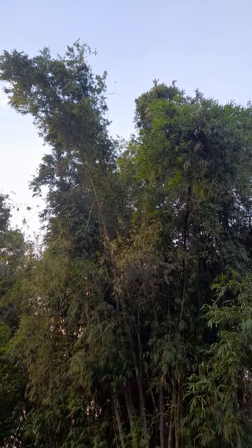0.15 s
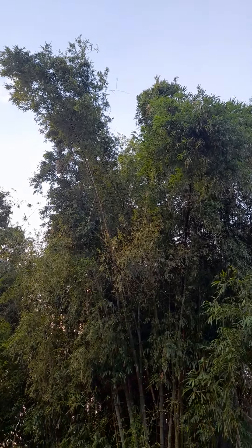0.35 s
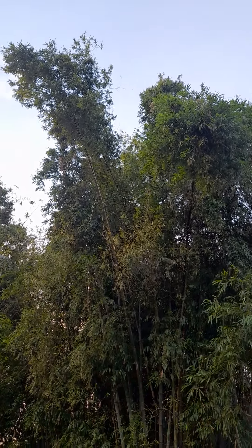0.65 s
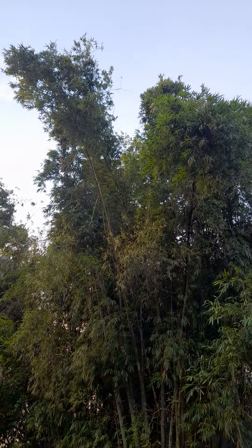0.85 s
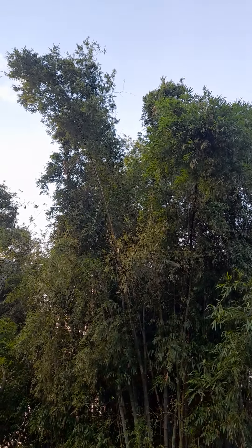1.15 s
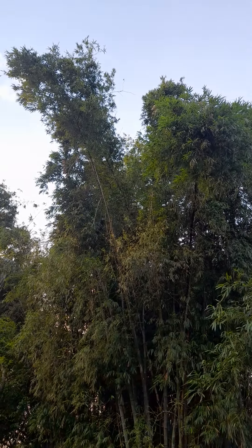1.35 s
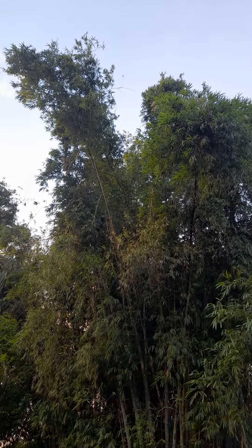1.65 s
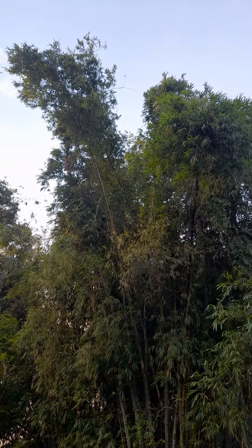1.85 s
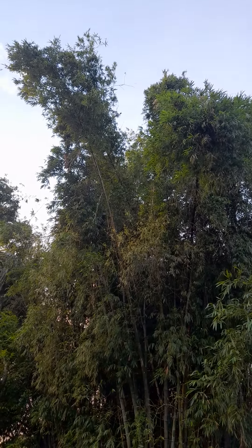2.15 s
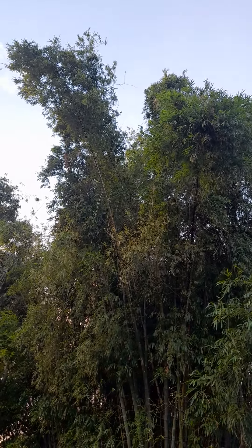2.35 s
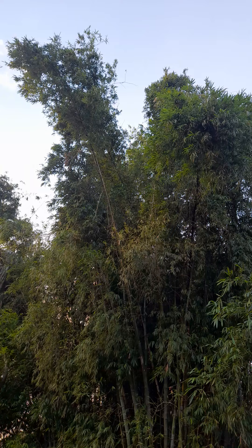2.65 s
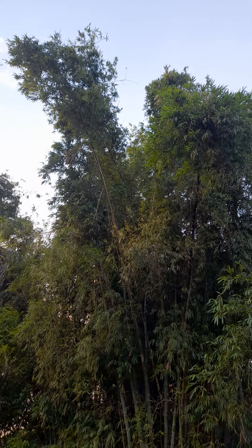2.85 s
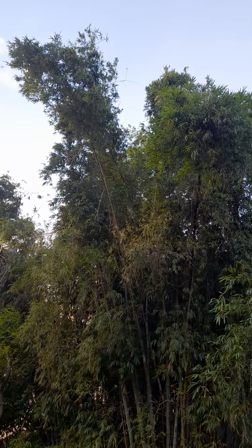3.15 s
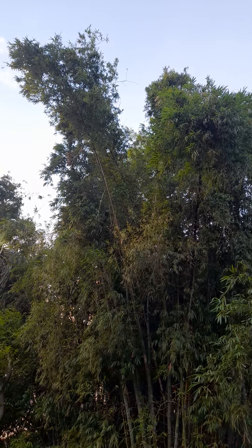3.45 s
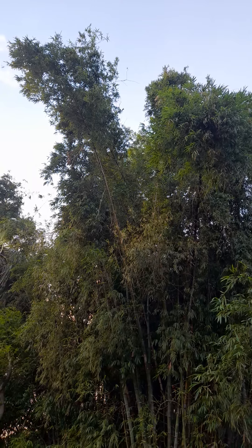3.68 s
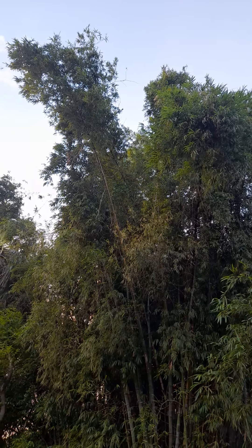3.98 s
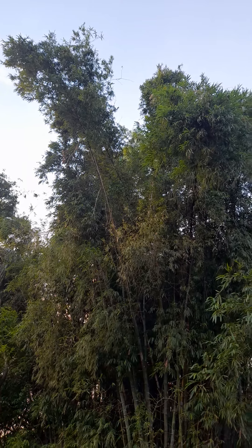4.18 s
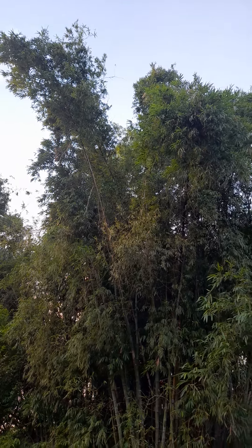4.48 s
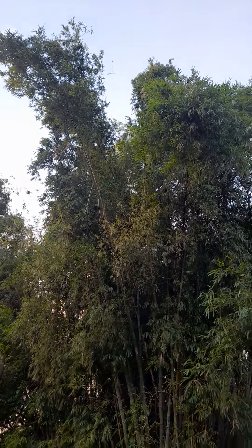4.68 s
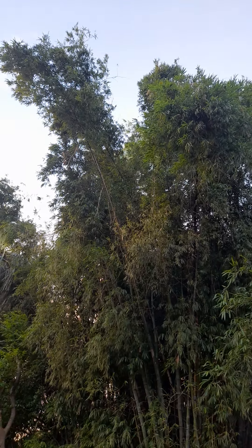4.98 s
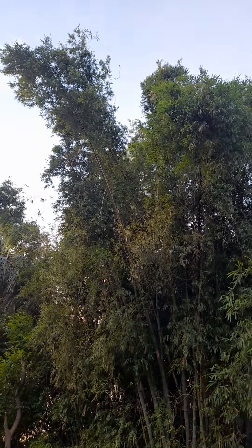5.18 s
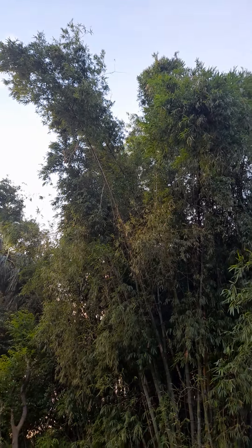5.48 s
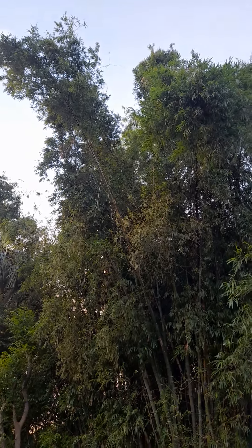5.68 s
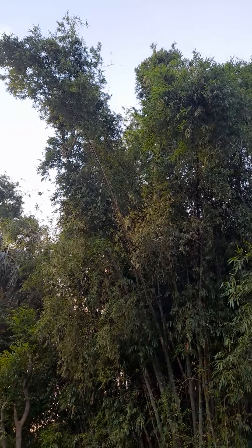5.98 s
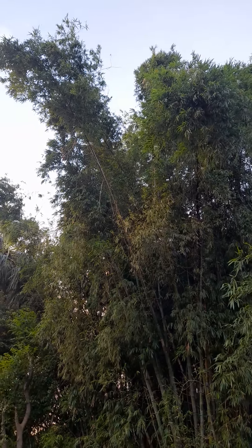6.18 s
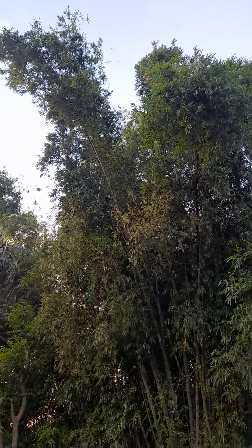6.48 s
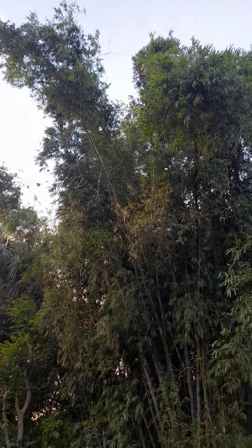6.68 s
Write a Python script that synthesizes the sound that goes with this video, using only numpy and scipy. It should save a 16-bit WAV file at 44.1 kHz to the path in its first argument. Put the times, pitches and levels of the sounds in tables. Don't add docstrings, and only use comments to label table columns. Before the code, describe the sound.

In a bamboo grove, a handheld phone hears a shrike's repeated dry, grating calls, swelling then stopping abruptly, with short leafy echoes. Early far knocks on wood, constant airy leaf noise, thin high cicada buzz and uneven deep handling-like rumble lie beneath. Near the end a duller distant bird answers, with a quiet dove-like hoot, a low coo and small chirps, before one last loud rasp is cut off.

```python
import sys
import numpy as np
from scipy import signal
from scipy.fft import rfft, irfft, next_fast_len
from scipy.io import wavfile
from scipy.ndimage import uniform_filter1d

SR = 44100
rng = np.random.default_rng(int(sys.argv[2]) if len(sys.argv) > 2 else 0)


def persist_wave(psi):
    counts = np.round(np.clip(psi, -1, 1) * 32767).astype(np.int16)
    wavfile.write(sys.argv[1], SR, np.atleast_2d(counts).T)


def invert_db(level):
    return 10 ** (np.asarray(level, dtype=float) / 20)


N = 301203


def evened(x):
    return x / np.sqrt(np.mean(x ** 2, -1, keepdims=True) + 1e-20)


def read(points, hz):
    f, value = np.transpose(points)
    return np.interp(np.log(hz + 1), np.log(f + 1), value)


def coloured(x, points, lag_samples=0.):
    size = next_fast_len(x.shape[-1] + 512)
    hz = np.fft.rfftfreq(size, 1 / SR)
    response = invert_db(read(points, hz)) * np.exp(-2j * np.pi * hz * lag_samples / SR)
    return irfft(rfft(x, size) * response, size)[..., :x.shape[-1]]


def resonate(x, hz, width_hz):
    turn = np.exp(2j * np.pi * np.cumsum(hz * np.ones(x.shape[-1])) / SR)
    r = np.exp(-np.pi * width_hz / SR)
    return 2 * (turn * signal.lfilter([1 - r], [1, -r], x / turn)).real


def drift(shape, size):
    return evened(uniform_filter1d(uniform_filter1d(rng.standard_normal(shape), size), size))


def add_at(out, start_s, sound):
    part = out[..., round(start_s * SR):][..., :sound.shape[-1]]
    part += sound[..., :part.shape[-1]]


def loudness(bird):
    threshold_db, smoothing_s = -49.5, 0.089
    power = abs(uniform_filter1d((bird ** 2).mean(0), round(smoothing_s * SR)))
    return 10 * np.log10(1 + power / invert_db(2 * threshold_db))


# frequency in Hz, level in dB per Hz.
HUM_COLOUR = [(120, -105.5), (200, -97.5), (320, -91.5), (780, -94.5), (1200, -97), (2000, -94),
              (3500, -94), (5500, -95), (7400, -96.5), (8300, -106), (9500, -101), (12000, -101),
              (14000, -105), (15500, -104)]
# frequency in Hz, left-right likeness.
HUM_SAME = [(60, 0.46), (180, 0.3), (550, 0.53), (1650, 0.088), (4970, 0), (15000, 0.081)]
# frequency in Hz, left minus right in dB.
HUM_SIDE = [(100, 0), (380, -3.5), (900, -2), (2300, -7), (3300, -3), (5000, -4), (7300, -3.5), (8200, 0),
            (12500, 3), (15500, 2)]
# time in seconds, level in dB.
HUM_COURSE = [(0, -1.5), (.8, -0.5), (1.6, -1), (2.2, -0.5), (3.5, 0.5), (4.5, 0), (5.2, .5), (5.55, 1.5),
              (6.1, 2), (6.83, -0.5)]


def hum(over_db):
    lift_per_db, swell_rms_db, patch_rms_db = 0.25, 0.74, 1.87
    frames, hz = N // 256 + 5, np.fft.rfftfreq(1024, 1 / SR)
    at = np.arange(frames) * 256
    a, b, c, d, patches = rng.standard_normal((frames, 513, 5)).T
    patches = uniform_filter1d(uniform_filter1d(patches, size=10, axis=0), size=12, axis=1)
    lift_db = lift_per_db * np.interp(at, np.arange(N), over_db - over_db.mean())
    swell_db = lift_db + swell_rms_db * drift(frames, size=30)
    far_db = np.interp(at / SR, *np.transpose(HUM_COURSE))
    reach = np.interp(hz, [1000, 3000], [1, .35])[:, None]
    same = np.clip(read(HUM_SAME, hz), -1, 1)[:, None]
    left = a + 1j * b
    z = np.array([left, same * left + np.sqrt(1 - same ** 2) * (c + 1j * d)])
    level_db = read(HUM_COLOUR, hz)[:, None] + patch_rms_db * patches / patches.std()
    level_db = level_db + reach * swell_db + (hz < 8000)[:, None] * far_db
    side_db = np.array([.5, -.5])[:, None, None] * read(HUM_SIDE, hz)[:, None]
    z *= invert_db(level_db + side_db)
    z[:, hz < 90] = 0
    return invert_db(20.5) * signal.istft(z, nperseg=1024, noverlap=768)[1][:, :N]


# peak in seconds, spread in seconds, level in dB, centre in Hz,
# upper skirt in dB relative to the level.
LUMPS = [(0.0, 0.24, -55.5, 57, 2), (.38, 0.047, -50, 72.4, -33), (.55, 0.053, -43, 81, -23),
         (.76, 0.17, -56, 75, -20), (1.0, 0.14, -50, 76, -21), (1.28, .13, -51, 78, -13),
         (1.72, 0.11, -47.5, 81.4, -21), (1.92, 0.12, -53.5, 96.5, -14), (2.36, 0.19, -49, 83.2, -8),
         (2.81, 0.029, -51.5, 68.5, -42), (3.06, 0.051, -47, 78, -64), (3.5, 0.02, -47.5, 63.6, -2),
         (3.74, 0.18, -52.5, 55, -17), (4.05, 0.16, -49.5, 68, -9), (4.28, 0.18, -52.5, 83, -10),
         (4.729, 0.078, -49, 74, -18), (4.95, 0.038, -48, 82.5, -22), (5.408, 0.031, -48.5, 73.4, -21),
         (5.6, 0.18, -49.5, 71, 3.5), (5.75, 0.025, -46.5, 73, -11), (5.948, 0.063, -46.5, 75, -5),
         (6.199, 0.048, -44, 71, -5), (6.44, 0.05, -45, 69.6, 0.5), (6.62, 0.2, -52, 73.6, -4)]


def rumble():
    rise_db, fall_db, calm_db = 10, 5., -62.5
    t = np.arange(0, N + 64, 64) / SR
    s, spread_s, peak_db, centre_hz, skirt_db = np.transpose(LUMPS)[..., None]
    u = (t - s) / spread_s
    loss_db = np.where(u < 0, rise_db * u ** 2, fall_db * u)
    power = invert_db(2 * (peak_db - loss_db)) + invert_db(2 * calm_db) / len(s)
    total = power.sum(0)
    slow = 10 * np.log10(total), (power * centre_hz).sum(0) / total, (power * skirt_db).sum(0) / total
    level_db, hz, skirt_db = (np.interp(np.arange(N) / SR, t, c) for c in slow)
    shared, left, right = rng.standard_normal((3, N))
    noise = np.array([shared + 0.73 * left, shared + 0.78 * right])
    core = evened(resonate(resonate(noise, hz, 19.2), hz, 46.5))
    core += 0.33 * evened(resonate(resonate(noise, 53.6, 21), 71, 27))
    steady = core / np.sqrt(uniform_filter1d((core ** 2).mean(0), size=5000) + 0.13)
    skirt = evened(resonate(resonate(noise, 82, 24), 127, 24))
    low = invert_db(level_db + 1.5) * (steady + invert_db(skirt_db - 12.0) * skirt) * invert_db([[-.8], [.8]])
    return signal.sosfilt(signal.butter(2, 35, "high", fs=SR, output="sos"), low)


# body resonance in Hz, width in Hz, left level in dB, right level in dB.
CICADAS = [
    (10870, 750, -85, -54.5),
    (10710, 990, -57, -53.5),
    (7440, 260, -80, -67.5),
]
CICADA_PULSE = [(131.6, .9), (137.5, .55), (43, .3)]


def cicadas(over_db):
    lift_per_db, fade_db = 0.089, -1.5
    swell_db = lift_per_db * over_db + fade_db * (np.arange(N) / N) ** 3
    out = np.zeros((2, N))
    for (hz, width_hz, left_db, right_db), (rate_hz, depth) in zip(CICADAS, CICADA_PULSE):
        turns = np.cumsum(rate_hz * (1 + .006 * drift(N, size=4000))) / SR
        bursts = 1 - depth + depth * 2 * np.exp(-(turns % 1) / .4)
        clicks = bursts * rng.standard_normal((2, N))
        buzz = resonate(resonate(clicks, hz, width_hz), hz, 1.15 * width_hz)
        out += evened(buzz) * invert_db(np.array([[left_db], [right_db]]) + 0.61 * drift(N, size=1500))
    return out * invert_db(swell_db - swell_db.mean())


# start in seconds, peak in dB, t60 in seconds.
KNOCKS = [
    (0.002, -48, 0.16),
    (0.553, -47.5, 0.34),
    (0.832, -47.5, 0.15),
    (1.049, -46.5, 0.15),
]
# frequency in Hz, level in dB.
KNOCK_COLOUR = [(250, -6), (700, 8.5), (1100, 2.5), (1400, 6), (2300, 4), (3200, -2), (5000, -28)]


def knocks():
    out, t = np.zeros((2, N)), np.arange(9000) / SR
    for start_s, peak_db, t60_s in KNOCKS:
        shared, left, right = rng.standard_normal((3, len(t)))
        burst = np.array([shared + 0.93 * left, shared + 0.88 * right]) * invert_db(-60 * t / t60_s)
        burst[:, 0] += 14.
        add_at(out, start_s, invert_db(peak_db) * coloured(burst, KNOCK_COLOUR) * invert_db([[-2.], [2.]]))
    return out


# start in seconds, length in seconds, level in dB, pitch in Hz.
COO = (5.5, .11, -59.5, 141)
# multiple of the pitch, level in dB.
COO_TONES = [(1, 5), (2, -2), (3, -5), (4, -1), (5, -7)]


def coo():
    start_s, length_s, level_db, hz = COO
    t, out = np.arange(0, length_s, 1 / SR), np.zeros(N)
    turns = 2 * np.pi * np.cumsum(hz * (1.03 - .06 * t / length_s)) / SR
    tones = sum(invert_db(db) * np.sin(k * turns) for k, db in COO_TONES)
    add_at(out, start_s, invert_db(level_db) * np.sin(np.pi * t / length_s) * tones)
    return out


# start in seconds, length in seconds, level in dB, pitch in Hz.
HOOT = [
    (5.54, 0.081, -61, 735),
    (5.693, 0.13, -60, 796),
    (5.92, 0.16, -64.5, 788),
    (6.01, 0.24, -64, 775),
]


def hoot():
    out = np.zeros((2, N))
    for start_s, length_s, level_db, hz in HOOT:
        t = np.arange(0, length_s, 1 / SR)
        turns = 2 * np.pi * np.cumsum(hz * (1 + 0.02 * drift(len(t), size=800))) / SR
        swell = np.sin(np.pi * (t / length_s) ** 0.57) ** 2
        note = invert_db(level_db + 2.5) * swell * (np.sin(turns) + 0.5 * np.sin(2 * turns))
        add_at(out, start_s, note * invert_db([[-1.5], [1.5]]))
    return out


# start in seconds, level in dB, start pitch in Hz, end pitch in Hz,
# length in seconds.
CHIRPS = [(1.396, -63.5, 6200, 5950, 0.046), (2.334, -67, 5600, 4352, 0.012),
          (2.37, -76, 5300, 4700, 0.0082), (4.795, -68, 2310, 2230, 0.049), (5.164, -66, 3040, 2880, .03),
          (5.503, -63, 1120, 1260, 0.015), (6.29, -62, 5900, 6100, 0.03), (6.438, -89, 5430, 4968, 0.011),
          (6.482, -66, 5160, 4352, 0.0133), (6.535, -67, 5500, 4940, .012), (6.577, -77, 6400, 3470, .012),
          (6.52, -68, 1850, 1870, 0.06)]


def chirps():
    side_db = -9
    out = np.zeros((2, N))
    for start_s, level_db, from_hz, to_hz, length_s in CHIRPS:
        hz = np.linspace(from_hz, to_hz, round(length_s * SR))
        note = np.sin(2 * np.pi * np.cumsum(hz) / SR) * np.hanning(len(hz))
        note *= 1 + 0.84 * drift(len(hz), size=40)
        add_at(out, start_s, invert_db(level_db + 9.5) * note * invert_db([[side_db / 2], [-side_db / 2]]))
    return out


# frequency in Hz, t60 in seconds.
GROVE = [(500, 0.18), (2000, 0.14), (5000, 0.22), (12000, 0.017)]


def grove(x):
    taps = np.zeros((2, SR // 2))
    at = np.arange(120, SR // 2 - 20, 20) + rng.integers(0, 20, (2, (SR // 2 - 121) // 20))
    np.put_along_axis(taps, at, rng.choice([-1., 1.], at.shape), 1)
    hz, t, z = signal.stft(taps, SR, nperseg=256)
    decay = invert_db(-60 * t / read(GROVE, hz)[:, None])
    decay = decay / np.linalg.norm(decay, axis=1, keepdims=True)
    tail = signal.istft(z * decay, SR, nperseg=256)[1]
    return signal.fftconvolve(x[None], tail / np.linalg.norm(tail[0]), axes=1)[:, :N]


def call(row, shape, opening):
    start_s, length_s, peak_db, top_hz, swell_db = row
    attack_s, peak_at, sag_db, release_s, ends_db = shape
    share, open_s, shut_db, open_db, rough = opening
    end_drop, pitch_wobble, rough_wobble = 0.0412, .018, 0.14
    t = np.arange(0, length_s, 1 / SR)
    places_s = [0, attack_s, peak_at * length_s, length_s - release_s, length_s]
    below_db = [swell_db + ends_db, swell_db, 0, sag_db, sag_db + ends_db]
    level_db = peak_db - np.interp(t, places_s, below_db)
    shut = np.exp(-t / open_s)
    ending = np.clip(1 - (length_s - t) / (2 * release_s), 0, 1)
    wobble = pitch_wobble * drift(len(t), size=900)
    pitch_hz = top_hz * (1 - (1 - share) * shut - end_drop * ending + wobble)
    bright_db = open_db + (shut_db - open_db) * shut
    return start_s + t, level_db, pitch_hz, bright_db, rough + rough_wobble * drift(len(t), size=900)


# frequency in Hz, level in dB.
TOP = [(7300, -10.5), (8150, -16.5), (8900, -11.5), (12000, -13), (14000, -24), (15000, -11)]


def rasp(controls, throat, beak, pipe, flutter, jitter, uneven, usual_hz):
    t, level_db, pitch_hz, bright_db, rough = controls
    rate_hz, sweep, throb = flutter
    shake = 2 * np.pi * (np.cumsum(rate_hz * (1 + 0.026 * drift(len(t), size=600))) / SR + rng.random())
    turns = np.cumsum(pitch_hz * (1 + sweep * np.sin(shake) + jitter * drift(len(t), size=40))) / SR
    pulses = sum(np.cos(2 * np.pi * k * turns + 0.297 * k * k) for k in range(1, 20))
    pulses *= 1 + uneven * np.cos(np.pi * turns)
    puffs = (0.7 + np.exp(-(turns % 1) / 0.16)) * rng.standard_normal(len(t))
    rough = np.clip(rough, 0, 1)
    drive = (1 - rough) * evened(pulses) + rough * evened(puffs)
    drive = drive * (1 + throb * np.cos(shake - .8))

    def beak_tone(multiple, width_hz, db):
        hz = multiple * pitch_hz
        return invert_db(db) * resonate(resonate(drive, hz, width_hz), hz, 2 * width_hz)

    low, main, high = (beak_tone(*row) for row in beak)
    stretch = (pitch_hz / usual_hz) ** 0.62
    high += sum(invert_db(db) * resonate(drive, hz * stretch, width_hz) for hz, width_hz, db in pipe)
    fill_db = 0.5 + level_db + 42
    fill = invert_db(fill_db) * resonate(drive, 4.69 * pitch_hz, 500)
    leak = invert_db(-5) * drive
    voiced = coloured(leak + low + main + fill + invert_db(bright_db + 1.5) * high, throat + TOP)
    voiced /= np.sqrt(uniform_filter1d(voiced ** 2, size=3000) + 1e-12)
    fade = np.clip(np.minimum(t - t[0], t[-1] - t) / .006, 0, 1)
    out = np.zeros(N)
    add_at(out, t[0], invert_db(level_db) * fade * voiced)
    return out


# start in seconds, length in seconds, peak in dB, top pitch in Hz,
# swell from onset to peak in dB.
FAR = [
    (1.536, 0.065, -55, 654, 1.5),
    (5.858, 0.48, -45.5, 731, 2.5),
    (6.457, 0.12, -54, 552, 0.5),
]
# frequency in Hz, level in dB.
FAR_THROAT = [(500, -52), (1100, -17), (2000, -17), (2800, -8.5), (3600, -5), (4300, -1.5), (5100, -4.5),
              (5900, -8.5), (6700, -13)]
# multiple of pitch, width in Hz, level in dB.
FAR_BEAK = [(4, 700, -4), (5, 700, 4), (7.3, 1190, -13)]
# frequency in Hz, width in Hz, level in dB.
FAR_PIPE = [(4970, 230, -6), (5700, 250, -10)]
# frequency in Hz, level in dB.
FAR_TOP = [(6000, 0), (12000, -6), (15000, 0)]


def far_shrike():
    shape = (0.058, .85, 0.54, 0.0253, 19)
    opening = (.85, .2, 2.7, 1.3, 0.62)
    flutter = (94, .05, .5)  # Hz, pitch swing, strength swing
    calls = sum(rasp(call(row, shape, opening), FAR_THROAT, FAR_BEAK, FAR_PIPE, flutter,
                     jitter=0.01, uneven=0.44, usual_hz=730) for row in FAR)
    return invert_db(-0.2) * coloured(calls, FAR_TOP)


# start in seconds, length in seconds, peak in dB, top pitch in Hz,
# swell from onset to peak in dB.
NEAR = [
    (0.208, 0.37, -47, 889, 4.5),
    (0.999, 0.34, -48.5, 880, 1.5),
    (1.763, 0.32, -43.5, 931, 6),
    (2.421, 0.31, -43.5, 903, 5),
    (3.142, .34, -46.5, 859, 2.5),
    (3.975, .362, -46, 861, 3),
    (4.73, 0.35, -42, 949.4, 7),
    (5.479, 0.33, -48, 857.5, 1.5),
    (6.727, 0.32, -42, 880, 9.5),
]
# frequency in Hz, level in dB.
NEAR_THROAT = [(500, -45), (1100, -19), (1700, -8), (2300, -4), (3000, 2), (3650, 0), (4050, 2), (4700, 2),
               (5250, -1), (5750, -10)]
# multiple of pitch, width in Hz, level in dB.
NEAR_BEAK = [(3.15, 710, -12.5), (4, 720, 7), (5.2, 950, 1.5)]
# frequency in Hz, width in Hz, level in dB.
NEAR_PIPE = [(4420, 220, -1), (4810, 250, -1), (5200, 250, -7)]


def near_shrike():
    shape = (0.042, 0.57, 1.35, 0.02056, 10.8)
    opening = (0.8, 0.09, -6.5, -6, 0.44)
    flutter = (99.5, .06, .55)
    calls = sum(rasp(call(row, shape, opening), NEAR_THROAT, NEAR_BEAK, NEAR_PIPE, flutter,
                     jitter=0.00913, uneven=0.8, usual_hz=880) for row in NEAR)
    return invert_db(8.0) * calls


# frequency in Hz, level in dB.
SCATTER = [(1000, -10.5), (2200, -1.5), (3000, -9), (5000, -2.5), (7000, 1), (15000, 15)]
# frequency in Hz, left minus right in dB.
BIRD_SIDE = [(1500, 3), (2500, -25), (3200, -8), (3700, -8.5), (5300, -4.5), (6000, 0), (7000, -4.5),
             (8400, 4), (10000, -13), (14000, 11), (15300, 0)]


def shrikes():
    near, far = near_shrike(), far_shrike()
    both = near + far
    diffuse = grove(coloured(near + invert_db(4.5) * far, SCATTER)) * invert_db([[-6.], [-3.]])
    left = coloured(both, BIRD_SIDE, lag_samples=-7)
    return np.array([left, both]) + diffuse


def scene():
    bird = shrikes()
    over_db = loudness(bird)
    background = hum(over_db) + rumble() + cicadas(over_db)
    return background + knocks() + coo() + hoot() + chirps() + bird


def low_pass(x):
    return signal.sosfilt(signal.butter(12, 15790, fs=SR, output="sos"), x)


def record(dry):
    edge = signal.firwin(2047, 15780, window=("kaiser", 9), fs=SR)
    limited = signal.oaconvolve(dry, edge[None], "same")
    return low_pass(limited)


dry = scene()
out = record(dry)
persist_wave(out)
```